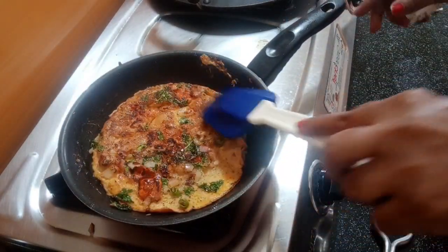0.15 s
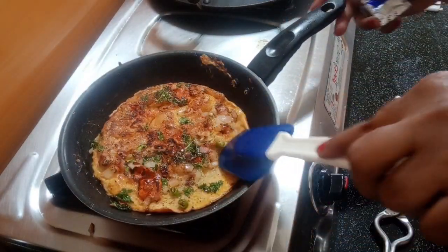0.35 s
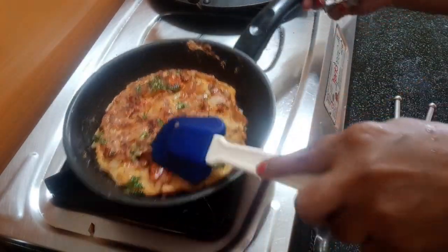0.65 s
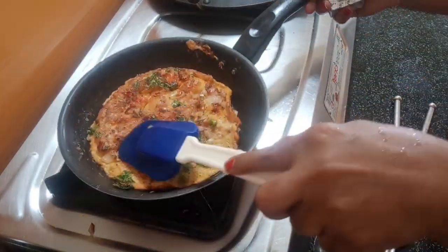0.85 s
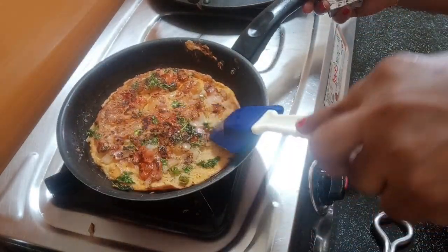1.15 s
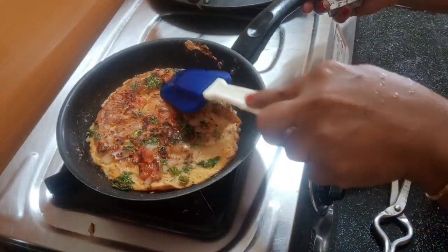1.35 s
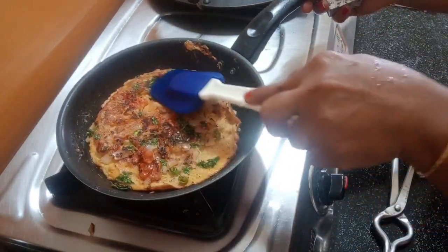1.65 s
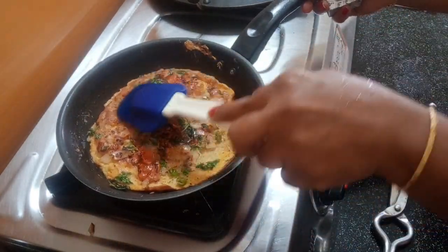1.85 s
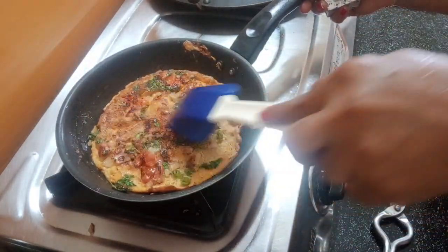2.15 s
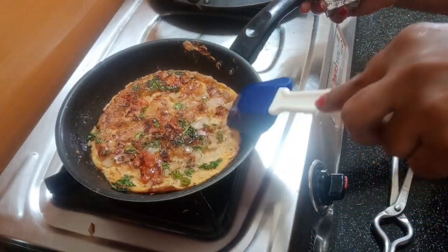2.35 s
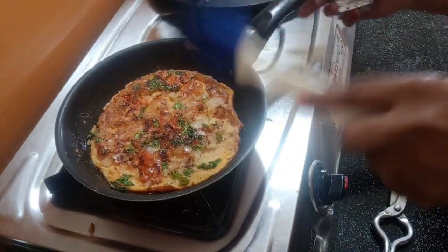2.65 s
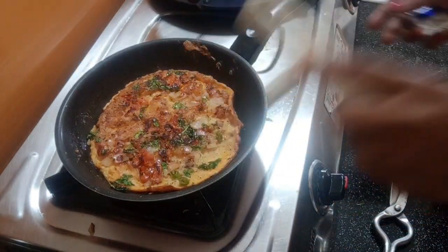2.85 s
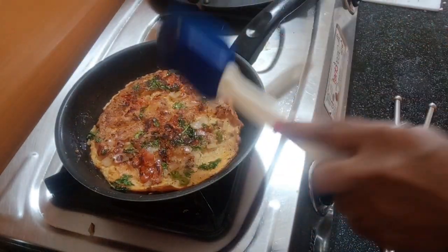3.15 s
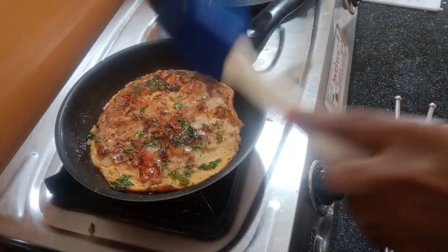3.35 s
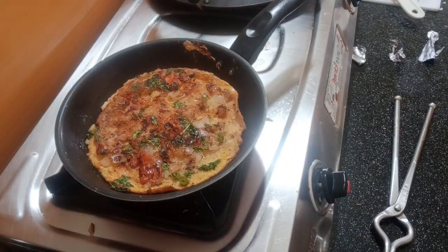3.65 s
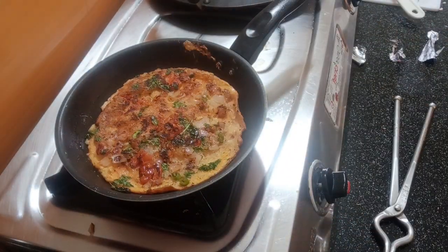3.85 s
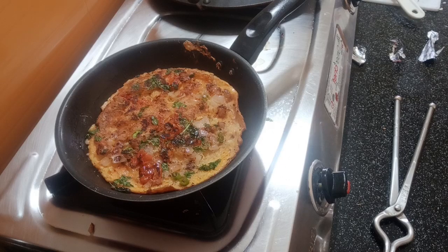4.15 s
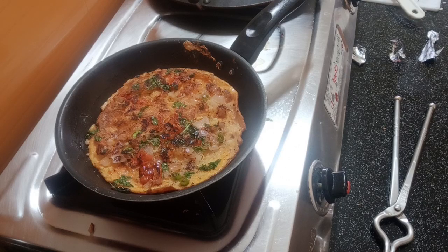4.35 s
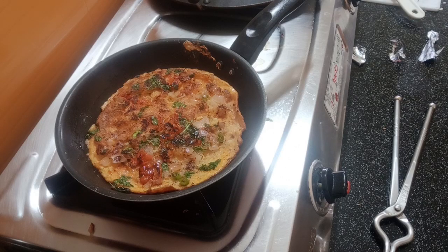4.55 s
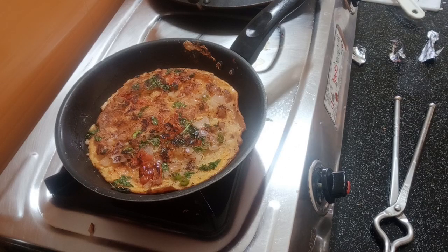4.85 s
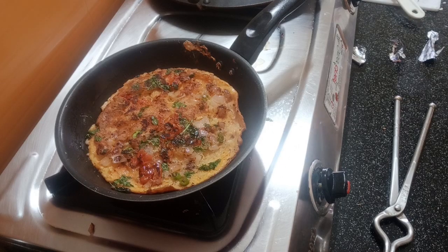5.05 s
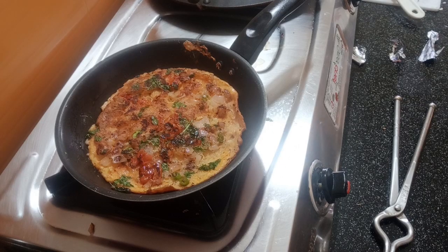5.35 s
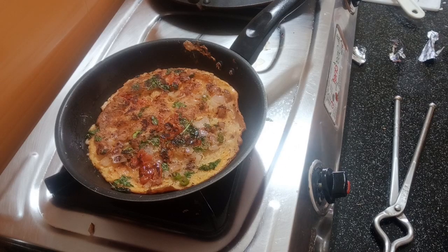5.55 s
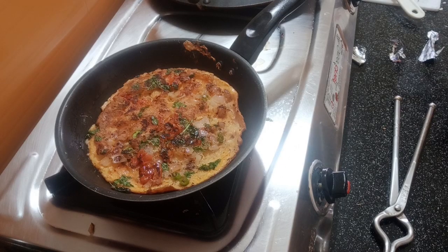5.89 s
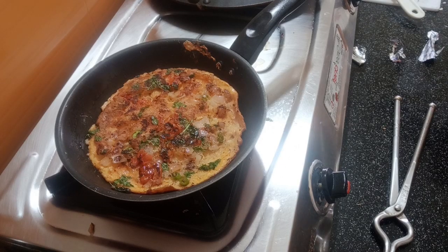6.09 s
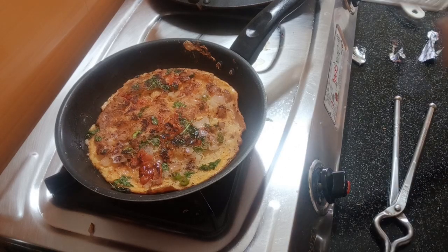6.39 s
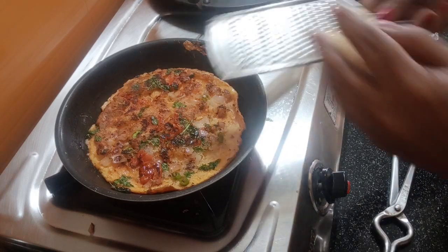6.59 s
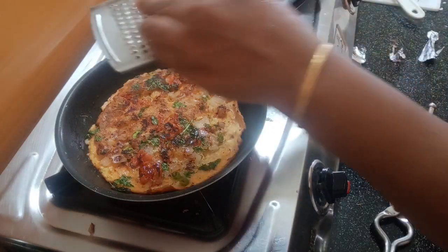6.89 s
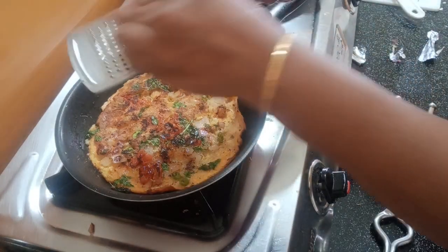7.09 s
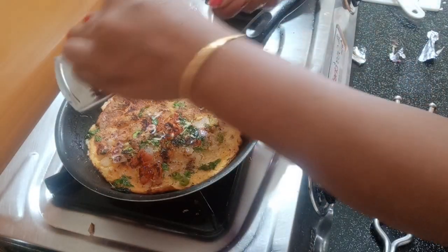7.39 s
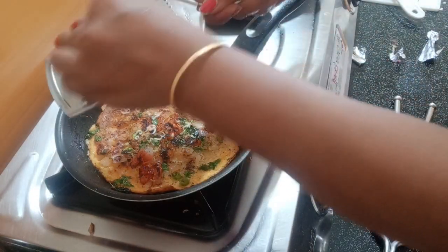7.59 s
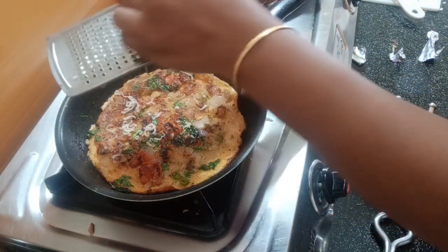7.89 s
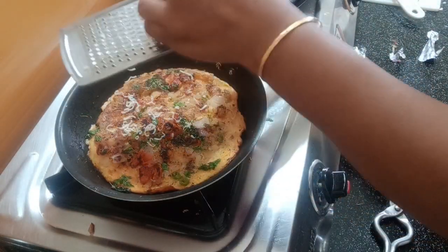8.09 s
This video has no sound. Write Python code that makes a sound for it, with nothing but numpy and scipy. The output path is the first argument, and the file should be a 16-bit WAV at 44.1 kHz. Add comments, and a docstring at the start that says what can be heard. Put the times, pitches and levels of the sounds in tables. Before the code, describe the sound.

An omelette sizzles faintly under spatula presses, then a drawer rolls open, steel utensils clatter, it shuts, and cheese is softly grated.

```python
"""Omelette, drawer and grater.

Steam bubbles burst as an omelette fries on a gas stove; a silicone spatula presses the egg and
knocks the pan on its support. A drawer grinds open on rough runners, steel utensils collide and ring
as one is pulled out, and the drawer rolls shut. Then cheese tears on a small steel grater above the
quietly simmering pan."""
import sys
import numpy as np
from scipy import signal
from scipy.io import wavfile
from scipy.ndimage import uniform_filter1d

SR = 44100
rng = np.random.default_rng(int(sys.argv[2]) if len(sys.argv) > 2 else 0)


def generate_wav(sig):
    """Save sig (samples, or channels by samples) to the path in sys.argv[1] as 16-bit PCM at SR."""
    pcm = np.round(np.clip(np.atleast_2d(sig).T, -1, 1) * 32767).astype(np.int16)
    wavfile.write(sys.argv[1], SR, pcm)


N = 362943
TIME = np.arange(N) / SR

# The pan's own sizzle, then the loudest spits of fat. Each row: time in seconds, relative level in dB.
FRYING_LEVEL = [(0.0, -52), (.6, -51.5), (1.0, -54), (1.35, -50.5), (1.9, -53.5), (2.6, -52), (3.3, -59),
                (3.65, -51.5), (3.73, -70), (3.9, -93)]
FAT_SPITS = [(.3692, -34), (.548, -33.5), (.593, -34), (.8794, -33), (1.2208, -32), (1.255, -20.5),
             (2.2443, -23), (2.4067, -31), (2.581, -34), (2.6285, -31), (2.6716, -28.5), (2.784, -31.5)]
# Spectra of a bursting bubble and of the stereo spread. Each row: frequency in Hz, gain in dB.
BUBBLE_SPECTRUM = [(590, -48), (1000, -29.5), (1430, -15), (1980, -16), (2180, -14), (2590, -13.5),
                   (3580, -10.5), (5190, -12.5), (5830, -7.5), (6550, 3), (7880, -10), (9280, -22),
                   (11300, -21.5), (12800, -14.5), (16000, -11)]
SIZZLE_SPREAD = [(3500, -51), (4300, -31), (5000, -40.5), (6200, -37), (7000, -52), (7800, -25.5),
                 (9500, -13.5), (12000, -23), (16000, -18.5)]
def sizzle(fry_db=-2, simmer_db=-72.5, flare_db=-4, pop_db=-9.5, spit_db=-4.5, spurt_db=2, spurt_s=.035):
    """Shot noise: countless bursting steam bubbles sum to a hiss. Returns middle and side signals."""
    pulse = unit_energy(click(BUBBLE_SPECTRUM))
    heat = np.maximum(amp(fry_db) * level(FRYING_LEVEL), amp(simmer_db))
    flare = amp(flare_db) * pressure(t60=.2)  # pressed egg meets fresh hot metal
    smoothing = signal.butter(2, .5 / spurt_s, fs=SR, output="sos")
    spurts = unit_rms(signal.sosfilt(smoothing, rng.standard_normal(N)))
    boiling = np.hypot(heat, flare) * amp(spurt_db * spurts)
    bubbles = (boiling * grains(per_s=5000, spread_db=2.5) for _ in range(2))
    middle, side = (wander(x, depth_db=2.5, width_hz=750, hold_s=.0047) for x in bubbles)
    pops = amp(pop_db) * boiling * grains(per_s=70, spread_db=2)
    spits = amp(spit_db) * bursts([(s, db, .00099) for s, db in FAT_SPITS])
    return through(middle + pops + spits, pulse), through(through(side, pulse), click(SIZZLE_SPREAD))


# Spatula presses. Each row: start in seconds, length in seconds, relative level in dB.
PRESSES = [(0.218, 0.24, -44.5), (0.474, 0.044, -55), (0.513, 0.15, -56.5), (1.043, 0.21, -42.5),
           (1.39, 0.069, -44.5), (1.488, .05, -51.5), (2.023, 0.057, -49.5), (2.238, 0.11, -52.5),
           (2.391, 0.083, -44.5), (3.46, 0.059, -61), (3.548, 0.039, -58.5)]
def pressure(t60, rise_share=.61):
    """Loading and relaxation: pressure builds during each press, then decays exponentially."""
    return sum(amp(db) * motion(s, length, rise_share * length, t60) for s, length, db in PRESSES)


# The spectrum of wet bubbles. Each row: frequency in Hz, gain in dB.
SQUELCH_SPECTRUM = [(600, -29.5), (1050, -10), (1300, -14), (1700, -1), (2600, -10.5), (3500, 3),
                    (4400, -8), (5600, 8.5), (6500, -3), (8000, -3.5), (10000, -49), (15000, -1)]
def spatula(press_db=1):
    """Vaporisation: egg squeezed against hot metal lets out larger, wetter bubbles."""
    bubbles = colour(pressure(t60=.23) * grains(per_s=6000, spread_db=4.5), SQUELCH_SPECTRUM)
    return amp(press_db) * wander(bubbles, depth_db=2.5, width_hz=300, hold_s=.03)


# Knocks of the pan. Each row: time in seconds, level in dB, hardness as a cut-off in Hz.
PAN_KNOCKS = [(.1095, -34, 6030), (.187, -47, 1200), (.254, -43.5, 1200), (.4485, -28, 7900),
              (.476, -41.5, 1490), (.572, -46, 1020), (.66, -35.5, 1600), (.692, -41.5, 1600),
              (.724, -40.5, 1320), (.812, -50.5, 1020), (1.4095, -40.5, 1630), (1.51, -35, 2780),
              (1.66, -40.5, 1510), (1.769, -34, 3060), (1.885, -52.5, 1020), (2.711, -53, 1000),
              (3.585, -57.5, 2510), (3.615, -62, 750)]
# The spectrum of a knock. Each row: frequency in Hz, gain in dB.
KNOCK_SPECTRUM = [(20, -46.5), (60, 5), (130, -19), (230, 0), (330, -8.5), (480, -13), (800, -10.5),
                  (1200, -8.5), (2000, -11), (3200, 0.5), (4300, -10), (7000, -11.5), (9500, -26),
                  (15000, -5.5)]
# The pan's dense ringing. Each row: frequency in Hz, 60 dB decay time (t60) in seconds.
KNOCK_DECAY = [(150, 0.13), (300, 0.23), (1100, 0.21), (3000, 0.046), (8000, 0.056)]
# The pan's modes. Each row: frequency in Hz, relative level in dB, t60 in seconds.
PAN_MODES = [(237.2, -9, 0.56), (730, -38.5, 0.088), (1035, -6.5, 0.069), (1260, -2.5, 0.16),
             (1660, -16.5, .1), (2190, -6, .1), (3060, -8.5, 0.41), (3324, 12, 0.046)]
def pan_knocks():
    """Impact excitation: the pan strikes its support and rings in its natural modes."""
    return blows(PAN_KNOCKS, KNOCK_SPECTRUM, KNOCK_DECAY, PAN_MODES,
                 modes_db=-8, crack_db=-21, rise_s=.0044, rise_power=2.2)


# The drawer opens, is jostled and shuts. Each row: start, length, run-up and run-out t60 in seconds,
# then relative levels in dB of panel boom, runner grinding and shaking contents.
DRAWER_MOVES = [(3.876, 0.23, 0.11, 0.28, -30, -35.5, -49), (4.119, 0.075, 0.0088, .26, -49, -41.5, -41),
                (4.387, .07, 0.012, 0.18, -61, -54, -80), (4.459, 0.44, 0.031, .19, -38.5, -32.5, -51.5),
                (5.124, 0.13, 0.053, 0.72, -59, -63, -52.5),
                (5.554, 0.24, 0.0096, 0.38, -30.5, -32.5, -42.5),
                (5.789, 0.088, 0.013, .2, -31.5, -49.5, -51.5), (5.922, 0.097, 0.056, 0.072, -42, -53, -61)]
def drawer_travel(boom_power=1.2, grind_power=.73, shake_power=2.3):
    """Power laws of speed: the runners grind first, then the panels boom, then the contents shake."""
    boom = grind = shake = 0
    for s, length, rise, t60, boom_db, grind_db, shake_db in DRAWER_MOVES:
        speed = motion(s, length, rise, t60)
        boom += amp(boom_db) * speed ** boom_power
        grind += amp(grind_db) * motion(s, length, rise, t60 * grind_power) ** grind_power
        shake += amp(shake_db) * speed ** shake_power
    return boom, grind, shake


# Spectra of the hollow box and of its runners. Each row: frequency in Hz, gain in dB.
BOX_SPECTRUM = [(20, -2), (50, -22.5), (75, -4), (100, 5), (170, -5), (230, 3), (320, -18), (600, -60.5)]
RUNNER_SPECTRUM = [(120, -17.5), (260, 3), (320, 6.5), (356, 10), (400, 2), (500, -3.5), (650, -1.5),
                   (900, -1.5), (1230, 3.5), (1700, -5), (2500, -10.5), (4000, -18), (9000, -53.5)]
# The box's modes. Each row: frequency in Hz, relative level in dB, t60 in seconds.
BOX_MODES = [(108, -5, 0.24), (141.1, 4, 0.16), (355, -11, 0.071)]
def drawer_roll(boom, grind, boom_db=-5, modes_db=4, grind_db=-3):
    """Forced vibration: rough runners grind and shake the hollow box."""
    box = unit_energy(click(BOX_SPECTRUM, size=32768)) + amp(modes_db) * ringing(BOX_MODES)
    panels = through(boom * grains(per_s=1100, spread_db=-.5), unit_energy(box))
    runners = colour(grind * grains(per_s=2300, spread_db=2), RUNNER_SPECTRUM)
    return amp(boom_db) * panels + amp(grind_db) * wander(runners, depth_db=4, width_hz=93, hold_s=.041)


# Bumps of the drawer. Each row: time in seconds, level in dB, hardness as a cut-off in Hz.
DRAWER_BUMPS = [(4.086, -35, 180), (4.128, -29, 1390), (4.477, -40.5, 1420), (5.153, -47, 249),
                (5.565, -29, 1688), (5.585, -30, 1500), (5.727, -29, 1880), (5.745, -24.5, 184),
                (5.806, -35.5, 223), (5.925, -36, 158.5), (6.27, -65, 1530)]
# The spectrum of a bump. Each row: frequency in Hz, gain in dB.
BUMP_SPECTRUM = [(20, -44.5), (55, -22), (100, 7.5), (150, 0.5), (230, -0.5), (350, -1.5), (500, -7),
                 (1200, -10.5), (2500, 0), (6500, -14.5), (10000, -48)]
def drawer_bumps():
    """Damped free vibration: the box thuds as it hits its runners and stops."""
    return blows(DRAWER_BUMPS, BUMP_SPECTRUM, decays=[(120, .071), (1200, .16), (6000, .04)],
                 modes=BOX_MODES, modes_db=0, crack_db=-4.5, rise_s=.004, rise_power=.16)


# A utensil is tugged out. Each row: start in seconds, length in seconds, relative level in dB.
TUGS = [(4.464, .04, -33), (4.541, 0.14, -27), (4.69, .035, -29), (4.77, .065, -23.5)]
# Utensils collide; the last three rows are faint steel pings after the drawer has shut. Each row: start in
# seconds, relative level in dB, contact time in seconds.
CLINKS = [(4.131, -39, 0.04), (4.479, -45, 0.011), (4.552, -29.5, 0.0051), (4.606, -31.5, 0.0024),
          (4.644, -28, 0.0033), (4.708, -32.5, 0.012), (4.788, -26.5, 0.0028), (4.819, -25.5, 0.0055),
          (4.84, -19, 0.011), (4.853, -21, 0.036), (4.899, -31.5, 0.0046), (6.595, -61, 0.029),
          (6.707, -60, 0.013), (7.035, -71.5, 0.0075)]
# The utensils' modes. Each row: frequency in Hz, relative level in dB, t60 in seconds.
STEEL_MODES = [(847, -3, 0.18), (1293.6, -4, 0.037), (1910, -8.5, 0.043), (2370, -2, .16),
               (3020, -23.5, .26), (3260, 2, 0.14), (3810, -3, 0.15), (4130, -7, .11), (4290, -5, 0.16),
               (5170, -11.5, .14), (5500, 2, .1), (5250, -2.5, .09), (5700, 9, 0.13), (6300, 6.5, .1),
               (7030, 0, .08), (7660, -20.5, 0.076)]
# Spectra of scraped and of shaken steel. Each row: frequency in Hz, gain in dB.
SCRAPE_SPECTRUM = [(880, -37.5), (1500, -14), (1900, -7), (2120, -11), (2410, -0.5), (2740, -6.5),
                   (3350, -3.5), (4690, -4.5), (5770, -1), (7610, -7.5), (9370, -26.5), (11500, -25),
                   (13700, -14.5), (16000, -12.5)]
RATTLE_SPECTRUM = [(1180, -18), (2000, -7.5), (2160, -5), (2380, -7), (2570, 1), (3260, 2.5), (4820, -2.5),
                   (6590, -2), (9330, -28), (12800, -30.5), (16000, -24)]
def utensils(shake, shake_db=-2, jostle_db=-2.5, clink_db=-1, ring_db=-5, muffled_ring_db=-9):
    """Modal superposition: steel slides and strikes, each contact ringing a different mix of modes."""
    shaking = amp(shake_db) * shake * grains(per_s=3600, spread_db=3.5)
    tugging = sum(amp(db) * motion(s, length, rise=.022, t60=.32) for s, length, db in TUGS)
    jostling = amp(jostle_db) * tugging * grains(per_s=5000, spread_db=3)
    contacts = jostling + amp(clink_db) * bursts(CLINKS)
    drive = amp(ring_db) * contacts + amp(muffled_ring_db) * shaking
    modes = unit_energy(damped_sines(STEEL_MODES))
    steel = sum(through(drive * rng.choice([-1, 1], N), mode) for mode in modes)
    scraping = colour(contacts, SCRAPE_SPECTRUM) + colour(shaking, RATTLE_SPECTRUM)
    return wander(scraping + steel, depth_db=5.5, width_hz=62, hold_s=.066)


# Ever firmer strokes of cheese. Each row: start in seconds, length in seconds, level in dB.
STROKES = [(7.561, 0.13, -62.5), (7.765, 0.069, -60), (7.847, 0.27, -59.5), (8.092, 0.17, -50)]
# The cheese catches on the teeth. Each row: time in seconds, relative peak level in dB.
CATCHES = [(7.5679, -35), (7.5951, -39), (7.8127, -41), (7.8426, -28), (7.8953, -45), (8.0057, -30),
           (8.097, -35), (8.1371, -27), (8.207, -27.5)]
# The spectrum of a snap. Each row: frequency in Hz, gain in dB.
SNAP_SPECTRUM = [(410, -55), (700, -29), (1080, -20.5), (1310, -36), (1400, -25), (1640, -13.5),
                 (2130, -23), (2530, -10), (3740, -3.5), (4050, -11), (4490, -8), (6570, -2.5),
                 (9480, -23.5), (14000, -15), (16000, -16)]
# The grater's modes. Each row: frequency in Hz, relative level in dB, t60 in seconds.
GRATER_MODES = [(1030, -33, 0.14), (1570, -9, 0.12), (2120, 10, 0.12), (2900, -11, .12), (3530, 11, 0.16),
                (3860, 4, 0.11), (4400, -4, 0.13), (4590, 25, 0.065), (5340, -5, .06), (5800, 13.5, 0.064),
                (6560, 22, 0.041)]
def grater(ring_db=-9):
    """Fracture noise: cheese tears on the teeth in small snaps, and the thin steel rings."""
    pulse = unit_energy(click(SNAP_SPECTRUM))
    push = sum(amp(db) * motion(s, length, rise=.0025, t60=.2) for s, length, db in STROKES)
    snaps = push * grains(per_s=1000, spread_db=3)
    for s, db in CATCHES:
        snaps[round(s * SR)] += amp(db) / abs(pulse).max()
    rasp = through(snaps, pulse) + amp(ring_db) * through(snaps, ringing(GRATER_MODES))
    return wander(rasp, depth_db=3.5, width_hz=200, hold_s=.05)


# Brief wavering tones. Each row: start and length in seconds, pitch in Hz, relative level in dB.
BRIEF_TONES = [(0.005, 0.072, 2560, -57.5), (0.28, 0.068, 2520, -56), (2.342, 0.051, 2700, -63),
               (2.363, 0.084, 241, -61.5), (4.467, 0.043, 861, -38), (4.586, 0.068, 353.7, -33.5),
               (4.702, 0.023, 3900, -31), (4.782, 0.029, 1270, -34), (4.783, 0.016, 3434, -28.5),
               (5.021, 0.1, 2960, -61), (5.154, 0.075, 964, -63), (5.191, 0.13, 2770, -64),
               (7.959, 0.092, 1092, -74.5)]
def brief_tones(waver_at_1khz=.04):
    """Random frequency modulation: squeaks, groans and short rings of struck steel waver in pitch."""
    out = np.zeros(N)
    for s, length, hz, db in BRIEF_TONES:
        waver = waver_at_1khz * np.sqrt(1000 / hz)  # higher tones hold steadier
        drift = unit_rms(uniform_filter1d(rng.standard_normal(SR), size=60))[:round(length * SR)]
        phase = 2 * np.pi * np.cumsum(hz * (1 + waver * drift)) / SR
        add(out, s, 2 * amp(db) * np.hanning(len(phase)) * np.sin(phase))
    return out


# The spectrum of the background hum and hiss. Each row: frequency in Hz, gain in dB.
BACKGROUND_SPECTRUM = [(15, -39.5), (25, -10.5), (108, 2), (249, 0), (293, 1.5), (531, -9.5), (1290, -11),
                       (1840, -15), (3720, -12.5), (5000, -26), (6560, -19.5), (7920, -10), (9320, -28.5),
                       (12500, -20), (16000, -22.5)]
# Two faint fuzzy tones. Each row: frequency in Hz, relative level in dB, t60 in seconds.
FAINT_TONES = [(1360, 2, 0.027), (7830, 8.5, .02)]
def background(floor_db=-73.5, tones_db=-83):
    """Stationary noise: a steady background of low burner hum, soft hiss and two faint tones."""
    floor = unit_rms(colour(rng.standard_normal(N), BACKGROUND_SPECTRUM))
    tones = unit_rms(through(rng.standard_normal(N), ringing(FAINT_TONES)))
    return amp(floor_db) * floor + amp(tones_db) * tones


def amp(db):
    """Decibels to gain."""
    return 10 ** (np.asarray(db) / 20)


def unit_rms(x):
    """Normalisation to an rms of 1."""
    return x / np.sqrt(np.mean(x ** 2) + 1e-20)


def unit_energy(x):
    """Normalisation to an energy of 1."""
    return x / (np.linalg.norm(x) + 1e-20)


def read(points, hz):
    """Interpolation on a log-frequency axis."""
    f, value = np.transpose(points)
    return np.interp(np.log(hz + 1), np.log(f + 1), value)


def level(rows):
    """A gain envelope from a curve in dB, silent outside it."""
    return amp(np.interp(TIME, *np.transpose(rows), left=-np.inf, right=-np.inf))


def motion(s, length, rise, t60):
    """An envelope of movement: quadratic rise, hold, exponential decay."""
    return np.clip((TIME - s) / rise, 0, 1) ** 2 * amp(-60 * np.maximum(TIME - s - length, 0) / t60)


def add(mix, s, sound):
    """Superposition of a sound at s seconds."""
    part = mix[max(round(s * SR), 0):][:len(sound)]
    part += sound[:len(part)]


def through(x, response):
    """Convolution, cut to the input's length."""
    return signal.oaconvolve(x, response)[:len(x)]


def click(spectrum, size=4096):
    """Minimum phase: the shortest causal pulse with a given spectrum."""
    log_gain = np.log(amp(read(spectrum, abs(np.fft.fftfreq(size, 1 / SR)))))
    return np.fft.ifft(np.exp(np.conj(signal.hilbert(log_gain)))).real[:size // 2]


def colour(x, spectrum):
    """Spectral shaping by a filter of unit energy."""
    return through(x, unit_energy(click(spectrum)))


def tail(decays, size=16384):
    """Diffuse decay: each band of noise dies at its own rate, given as (Hz, t60 in seconds)."""
    hz, t, bands = signal.stft(rng.choice([-1., 1.], size), SR, nperseg=128)
    fade = amp(-60 * t / read(decays, hz)[:, None])
    return unit_energy(signal.istft(bands * fade, SR, nperseg=128)[1])


def damped_sines(modes, size=16384):
    """Damped oscillators, one for each mode."""
    t = np.arange(size) / SR
    return np.array([amp(db - 60 * t / t60) * np.sin(2 * np.pi * hz * t) for hz, db, t60 in modes])


def ringing(modes):
    """The impulse response of all modes together, at unit energy."""
    return unit_energy(damped_sines(modes).sum(0))


def grains(per_s, spread_db):
    """A Poisson process: random impulses of uneven size, at an rms of 1."""
    size = amp(spread_db * np.minimum(rng.exponential(1, N), 5))
    return unit_rms(size * rng.choice([-1, 1], N) * (rng.random(N) < per_s / SR))


def bursts(rows, size=8192):
    """Transients of exponentially decaying noise."""
    out = np.zeros(N)
    for s, db, decay_s in rows:
        add(out, s, amp(db) * np.exp(-TIME[:size] / decay_s) * rng.choice([-1, 1], size))
    return out


def blows(rows, spectrum, decays, modes, modes_db, crack_db, rise_s, rise_power):
    """Impacts give a crack, dense ringing and modes; softer ones are duller and swell more slowly."""
    out, pulse, ring = np.zeros(N), click(spectrum), ringing(modes)
    for s, db, hard_hz in rows:
        rise = rise_s * (1000 / hard_hz) ** rise_power
        dense = tail(decays)
        dense *= 1 - np.exp(-TIME[:len(dense)] / rise)
        dense[round(SR / 1000)] += amp(crack_db) * np.exp(-rise / .00067)
        body = unit_energy(through(dense, pulse)) + amp(modes_db) * ring
        body = signal.lfilter(*signal.butter(3, min(hard_hz, SR / 3), fs=SR), body)
        add(out, s, amp(db) * body / np.std(body[:SR // 50]))  # the first 20 ms set the level
    return out


def wander(x, depth_db, width_hz, hold_s):
    """Shifting contact points favour different resonances from moment to moment."""
    bands = signal.stft(x, SR, nperseg=512, noverlap=384)[2]
    patches = rng.standard_normal(bands.shape)
    for axis, span in enumerate([width_hz * 512 / SR, hold_s * SR / 128]):
        kernel = np.exp(-(np.arange(-40, 41) / (span / 2)) ** 2)
        patches = signal.fftconvolve(patches, np.expand_dims(kernel, 1 - axis), "same")
    gain = unit_rms(amp(depth_db * unit_rms(patches)))
    return signal.istft(bands * gain, SR, nperseg=512, noverlap=384)[1][:N]


def radiate(x, low_hz):
    """Radiation efficiency: a body gives off little sound at wavelengths longer than itself."""
    return signal.sosfilt(signal.butter(4, low_hz, "high", fs=SR, output="sos"), x)


# The kitchen's reverberation. Each row: frequency in Hz, t60 in seconds.
KITCHEN_DECAY = [(150, 0.31), (1000, 0.26), (4000, 0.32), (12000, .2)]
# The clatter's stereo spread. Each row: frequency in Hz, side relative to middle in dB.
CLATTER_SPREAD = [(3500, -78.5), (7600, -38.5), (8500, -7), (10000, -7), (11700, -4.5), (13000, -18),
                  (16000, -22)]
def scene(stove_room_db=-13, drawer_room_db=-11):
    """Direct and reverberant sound: the stove is close; the more distant drawer carries more room."""
    knocks, bumps = pan_knocks(), drawer_bumps()
    boom, grind, shake = drawer_travel()
    frying, frying_side = sizzle()
    clatter = utensils(shake)
    near = radiate(knocks, low_hz=119.4) + frying + spatula() + grater() + brief_tones()
    far = radiate(drawer_roll(boom, grind) + bumps, low_hz=78) + clatter
    room = through(amp(stove_room_db) * near + amp(drawer_room_db) * far, tail(KITCHEN_DECAY))
    middle = near + far + room + background()
    scattered = through(clatter, tail([(1000, .04), (10000, .04)]))
    side = frying_side + through(scattered, click(CLATTER_SPREAD))  # only the treble is spread
    return np.array([middle + side, middle - side])


def record(dry, edge_hz=15800):
    """Band limiting by a steep low-pass filter."""
    low_pass = signal.firwin(511, edge_hz, window=("kaiser", 9), fs=SR)
    return signal.oaconvolve(dry, low_pass[None], "same")


dry = scene()
out = record(dry)
generate_wav(out)
```